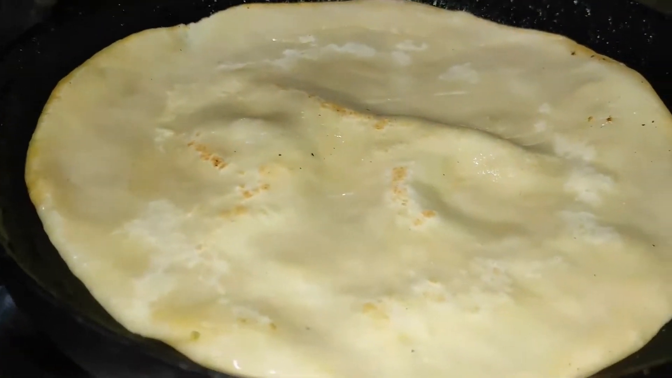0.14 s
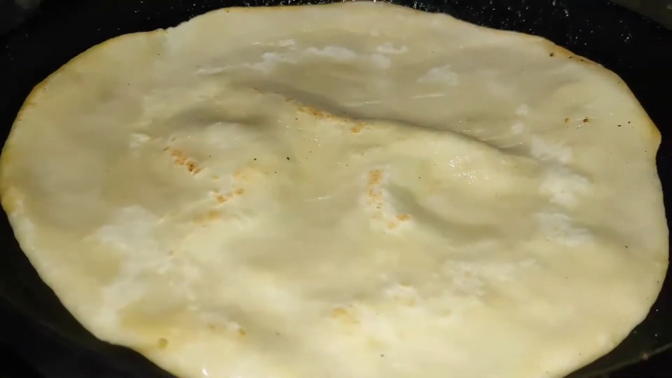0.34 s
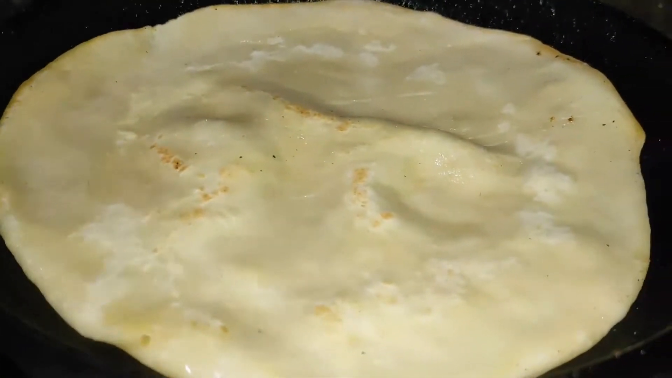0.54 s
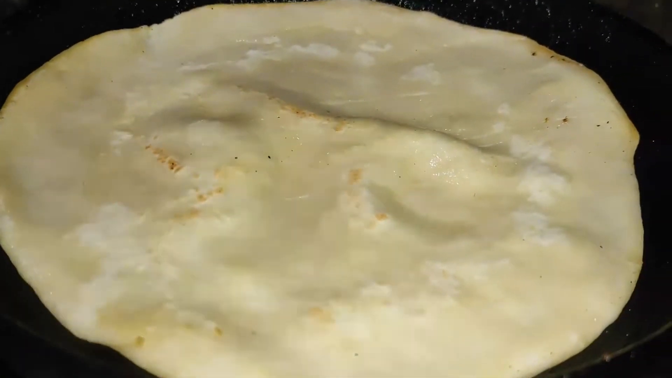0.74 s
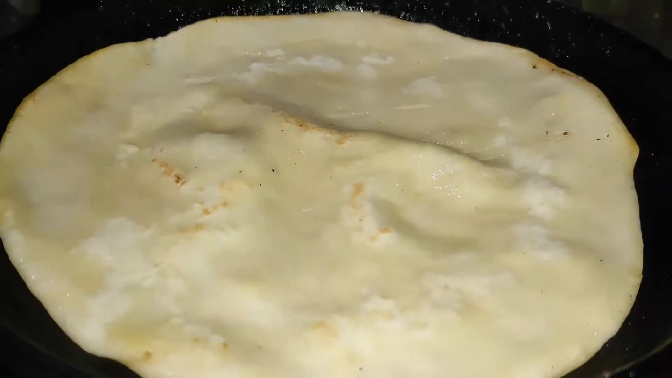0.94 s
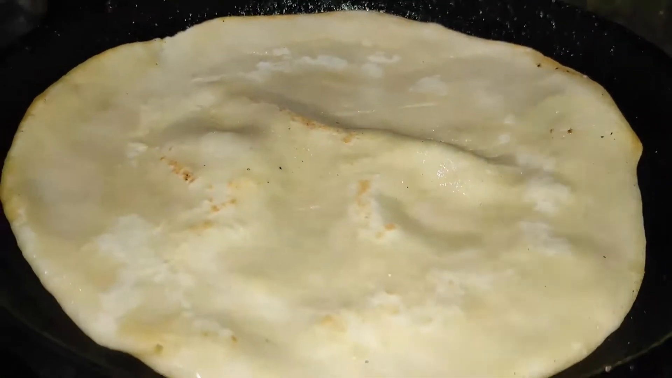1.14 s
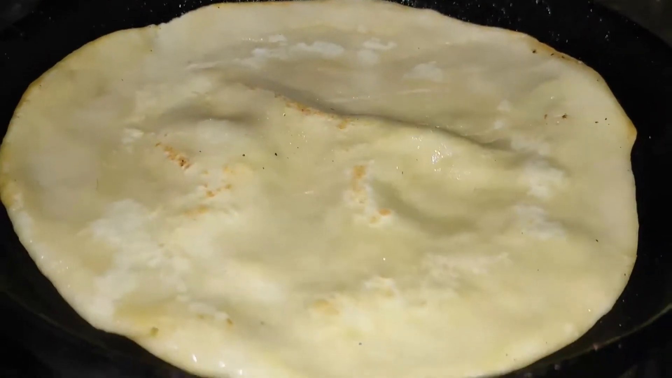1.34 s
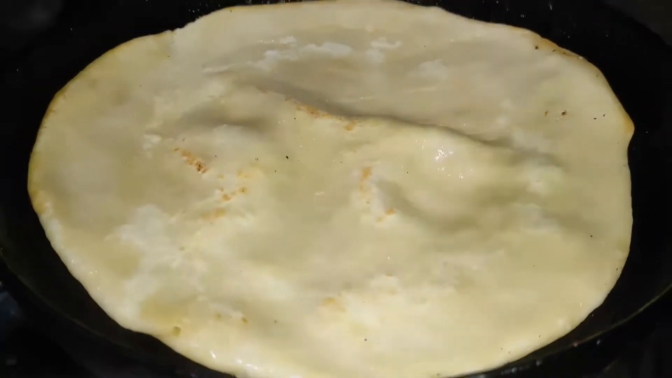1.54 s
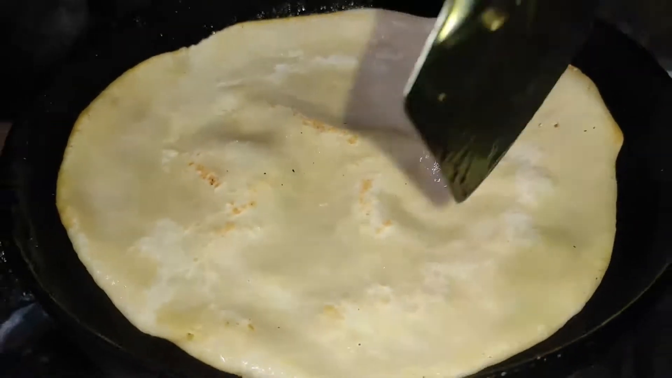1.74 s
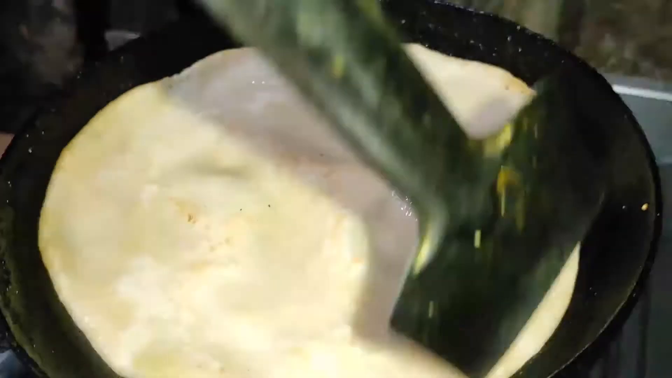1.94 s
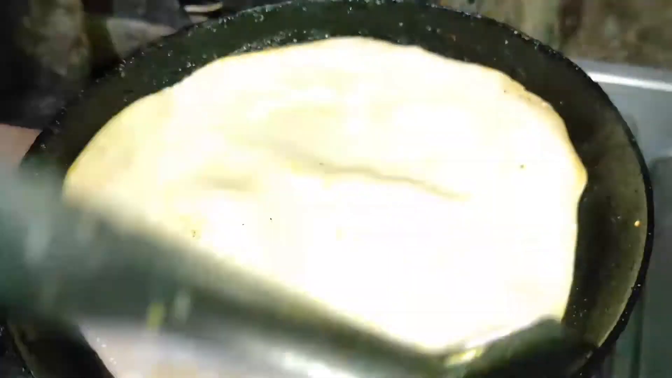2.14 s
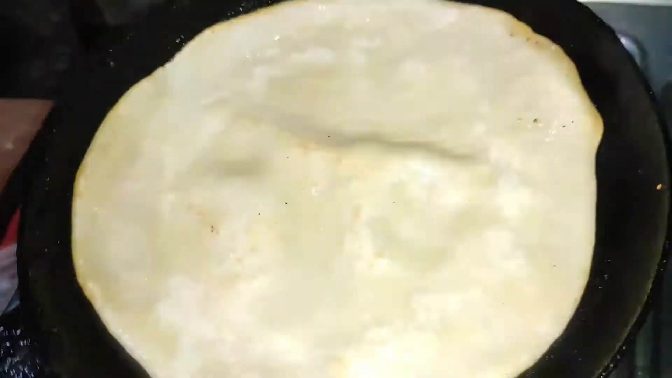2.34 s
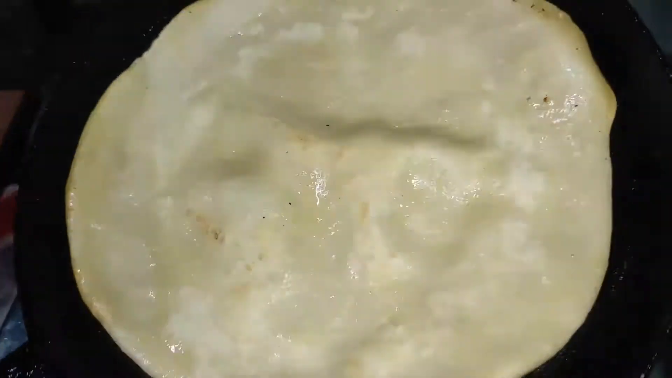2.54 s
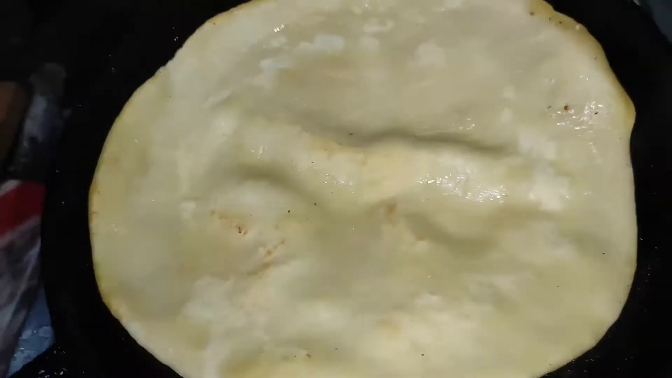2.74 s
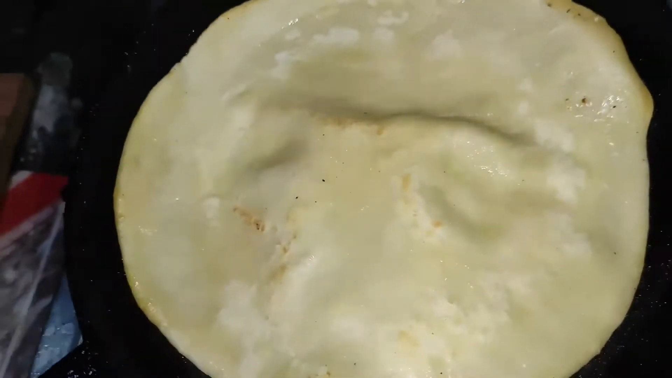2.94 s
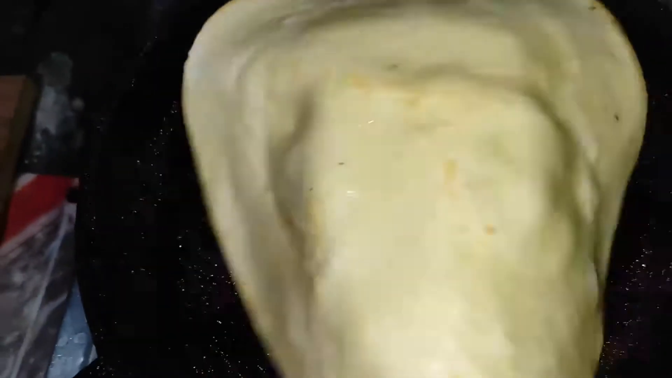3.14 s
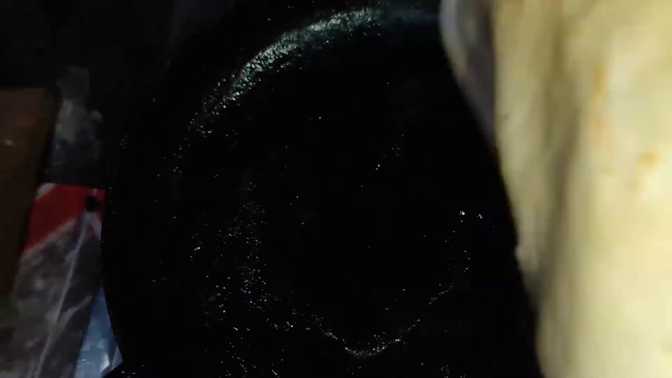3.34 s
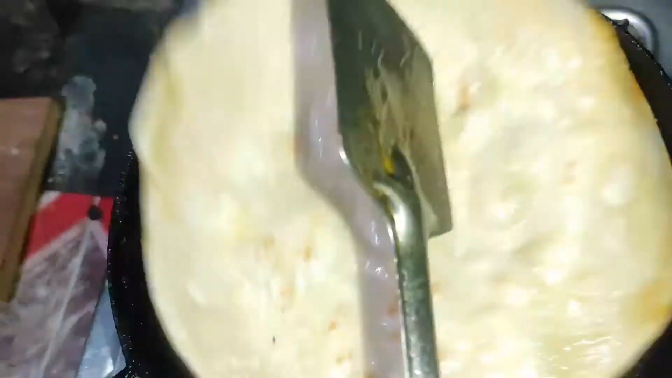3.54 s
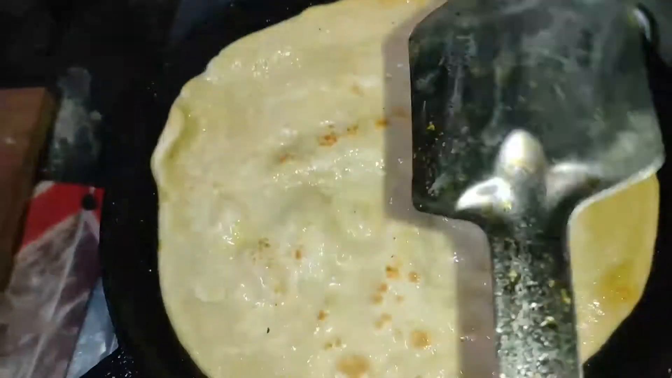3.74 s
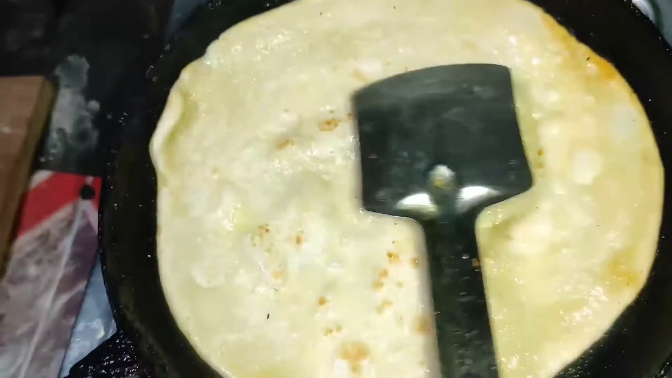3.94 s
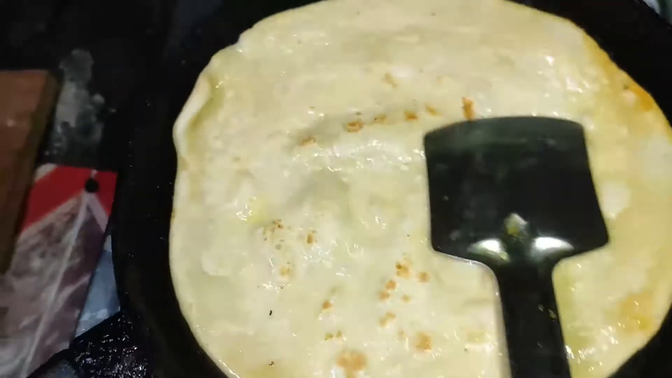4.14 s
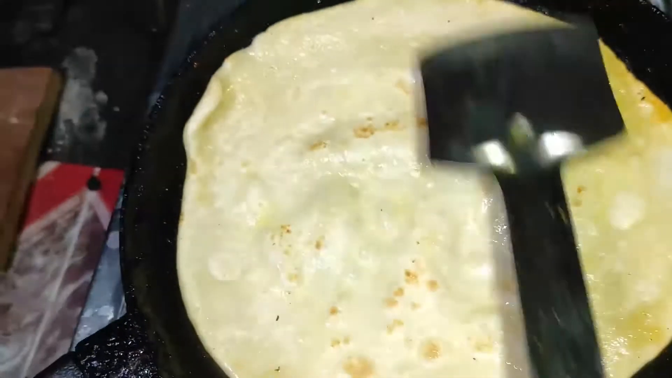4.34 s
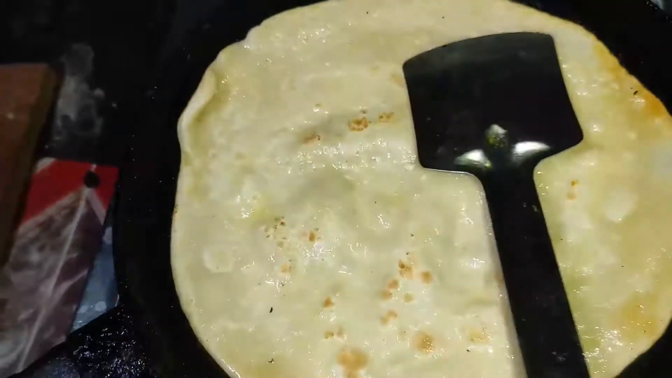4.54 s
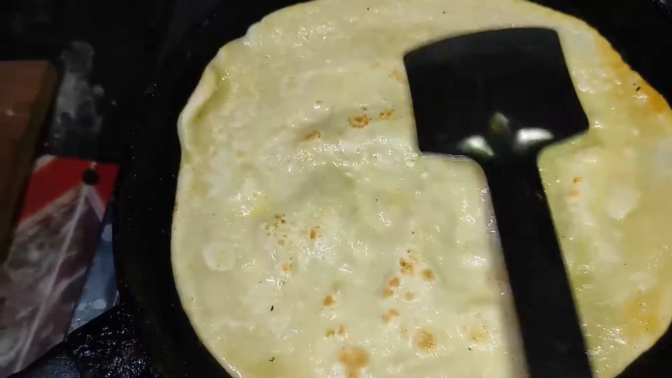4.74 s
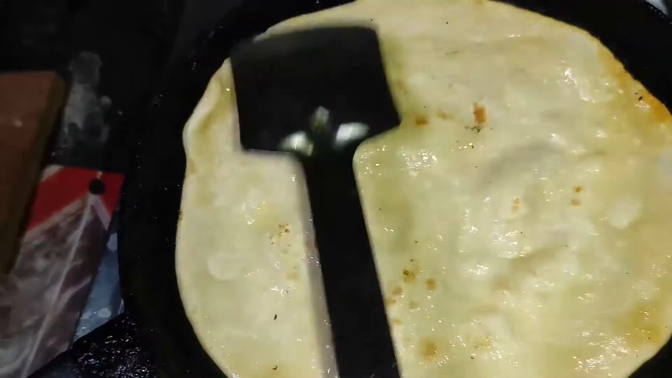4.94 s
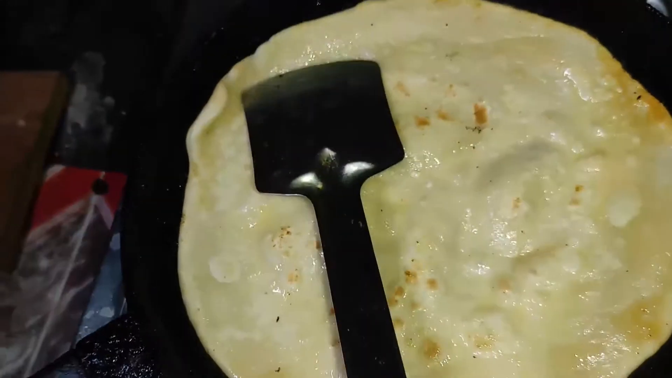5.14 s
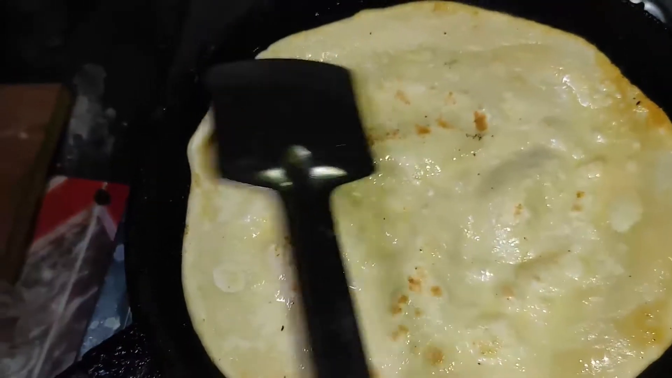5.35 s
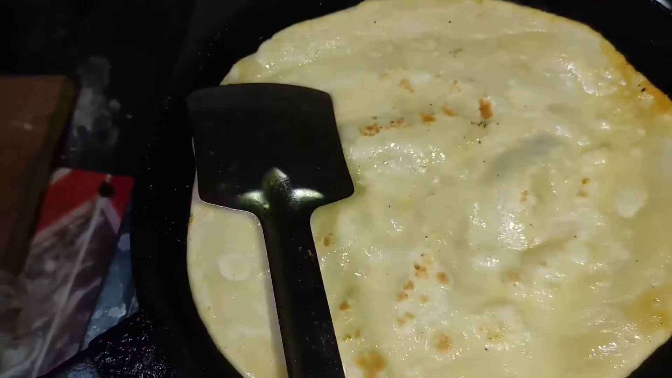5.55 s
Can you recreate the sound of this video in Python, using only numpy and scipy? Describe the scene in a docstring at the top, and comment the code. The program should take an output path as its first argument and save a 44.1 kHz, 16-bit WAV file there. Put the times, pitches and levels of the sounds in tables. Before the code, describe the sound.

A steel spatula knocks and scrapes on a flat iron pan while a flatbread sizzles faintly in oil.

```python
"""A steel spatula knocks on a flat iron pan, close to the microphone's two ports, in a small kitchen.
Each knock is a crunch of contact, a thump of the bending pan and a boom of pan and room; tinks ring steel.
The blade scrapes under a flatbread, wipes over it and rubs it about: grainy friction, some through resonances.
Around it oil sizzles, spits and spatters as crowds of tiny random bursts, among dry ticks and light taps.
Underneath, the stove murmurs as low coloured noise that slowly sinks, with one brief low sputter."""
import sys
import numpy as np
from scipy import signal
from scipy.fft import rfft, irfft, next_fast_len
from scipy.io import wavfile
from scipy.ndimage import uniform_filter1d, map_coordinates

SR = 44100
rng = np.random.default_rng(int(sys.argv[2]) if len(sys.argv) > 2 else 0)


def to_wav(sig):
    """Store sig (one row per channel, or 1-D mono) as 16-bit WAV at the path in sys.argv[1].

    Samples outside -1..1 are clipped; the rate is SR.
    """
    pcm = np.clip(np.atleast_2d(sig), -1, 1) * 32767
    pcm = np.round(pcm).astype(np.int16)
    wavfile.write(sys.argv[1], SR, pcm.T)  # frames by channels


N = 247401
TIME = np.arange(N) / SR

# spatula blows on the pan: start_s, contact_db, contact_length_s, treble_db, boom_db, dullness_db_per_octave
KNOCKS = [(2.372, -39, 0.0023, 11.5, -32, 6), (2.413, -35.5, 0.0015, 5, -34.5, 6.5),
          (2.503, -36.5, 0.004, 14, -30.5, 8), (2.685, -41, 0.0098, 24, -38, 5),
          (2.9901, -19, 0.0022, -14, -25, 0.5), (3.004, -30, .005, -4, -24, 1.5),
          (3.327, -37.5, 0.0042, 21, -42, 2), (3.939, -23, 0.0037, 7, -34, 12),
          (3.945, -16.3, 0.0042, 1, -20.5, 1.5), (3.97, -21.5, 0.0071, -1, -18, 2),
          (3.982, -27, 0.0048, -0.5, -23, 4.5), (4.347, -40.5, 0.0038, 4, -47, -1.5),
          (4.52, -50, 0.0037, 9, -43, 9), (4.8045, -36.5, 0.0013, -17, -38.5, 6.5),
          (5.347, -52.5, 0.0039, 2, -47.5, 7)]
# colour of the blade's contact: freq_hz, level_db
BLADE_COLOUR = [(60, -27), (200, -17), (400, 1), (700, -14.5), (1000, 9.5), (1350, 6), (1950, 0),
                (2600, 4.5), (3800, -6), (4800, -10), (6300, -3), (8200, 3.5), (9800, -21), (15000, -17)]
# colour of the boom of pan and room: freq_hz, level_db
BOOM_COLOUR = [(30, -10), (90, -12), (200, -1.5), (550, 1), (1200, -2), (1900, -9.5), (2600, -4.5),
               (4000, -14.5), (6000, -13.5), (8200, -6), (15000, -55)]
# how long the boom lasts: freq_hz, t60_s
BOOM_T60 = [(100, 0.71), (400, 0.31), (1200, 0.5), (3000, 0.33), (8000, 0.31)]
# ringing modes of the pan: pitch_hz, level_db, t60_s
PAN_MODES = [(101.9, -1.5, 0.58), (149, -5.5, 0.26), (197, -1.5, 0.5), (236.8, -0.5, 0.32), (297, -4, 0.66),
             (346, 0.5, 0.64), (421, -1.5, 0.53), (451, 3, 0.28), (588, -2, 0.44), (690, 4.5, 0.42),
             (758, 0, 0.44), (1053, 4.5, 0.19), (1214, 3, 0.24), (1360, 6, 0.23)]
# a shorter contact is brighter: it tilts by this many dB per octave for each halving of the neutral length
HARDENING_DB, NEUTRAL_CONTACT_S = 4, 0.0028
# light tinks of steel: start_s, level_db, t60_s, left_right_db
TINKS = [(.699, -36.5, 0.12, 24), (0.8407, -29, 0.17, 3), (3.638, -35, 0.15, 23), (4.343, -39.5, 0.12, 19),
         (4.817, -41.5, 0.26, 13)]
# modes of the steel: pitch_hz, level_db, share_of_t60
STEEL_MODES = [(8370, -3.5, 0.84), (12100, -19, 0.41), (14400, -25, .5)]
# the blade catches, then slides under the bread in two pushes: peak_s, level_db, fade_s
SCRAPES = [(2.972, -35.5, 0.028), (3.09, -38, 0.13), (3.23, -40, 0.048)]
# resonances of the sliding blade, woken as the contact travels: peak_s, pitch_hz, level_db, glide_octaves_per_s
SCRAPE_MODES = [(3.05, 880, -42, 0), (3.095, 1335, -36.5, .6), (3.09, 2110, -44, -.4),
                (3.138, 2370, -41.5, -.5), (3.165, 2745, -47, 0), (3.2, 2150, -40.5, -.7),
                (3.205, 990, -39, -1.2), (3.21, 3130, -48, 0), (3.275, 950, -43.5, -.3)]
# the blade wipes over the bread: peak_s, level_db, fade_s
WIPES = [(4.52, -43.5, 0.087), (4.87, -52.5, 0.1), (5.58, -58.5, 0.27)]
# colour of the wiping: freq_hz, level_db
WIPING_COLOUR = [(60, -9.5), (360, 5.5), (540, -2.5), (680, -1), (1300, 1), (2000, -8.5), (2750, -1.5),
                 (5000, -13.5), (12000, -35)]
# shoves that rub bread and blade over the iron: peak_s, level_db, fade_s
SHOVES = [(2.43, -44, 0.042), (2.56, -45.5, 0.1), (2.72, -47.5, 0.17), (2.96, -48.5, 0.068),
          (3.15, -50.5, 0.27)]
# colour of the rubbing: freq_hz, level_db
RUBBING_COLOUR = [(50, -9), (150, -19), (240, 5.5), (320, -4), (435, 8), (540, -8.5), (720, 4), (920, -4.5),
                  (1500, -18), (2700, -12.5), (12000, -34)]
# the bread sticks and groans on the iron: peak_s, level_db, pitch_hz
GROANS = [(2.38, -36, 728), (2.393, -38, 245.8), (2.508, -39.5, 922), (2.593, -44, 245),
          (2.716, -42.5, 730), (2.752, -47, 740)]
# small dry ticks and light taps at the pan: start_s, level_db
TICKS_AND_TAPS = [(0.664, -53), (0.974, -52), (1.404, -58), (1.603, -53.5), (1.839, -55), (4.42, -51.5),
                  (4.8049, -43.5), (5.053, -54.5)]
# short bright bursts, spits of oil and one hissing scuff (at 2.496 s): start_s, level_db, length_s
BRIGHT_BURSTS = [(0.0248, -45, 0.00057), (0.192, -44.5, 0.008), (0.597, -43, 0.006), (2.496, -34.5, .012),
                 (2.892, -39.5, 0.000403), (2.922, -37, .005), (3.073, -33, .002), (3.54, -34.5, 0.00068),
                 (3.594, -38.5, 0.002), (3.666, -39.5, 0.001), (3.742, -31, 0.0045), (3.831, -37.5, 0.0035),
                 (4.167, -43.5, .0004), (4.3175, -49, 0.0003)]
# colour of these bright bursts: freq_hz, level_db
SPIT_COLOUR = [(500, -35), (2000, -14.5), (3500, -8), (5500, -7), (7000, 5.5), (8300, 10.5), (10000, -7.5),
               (15000, -13)]
# colour of the fine crackle of oil at the bread's edge: freq_hz, level_db
CRACKLE_COLOUR = [(800, -26), (2400, 4), (3300, -7), (6200, -6.5), (9500, 1), (15000, 2.5)]
# the sizzle flares when moist dough meets hot oil: peak_s, level_db, fade_s
FLARES = [(1.0, -54.5, 1), (1.66, -45.5, 0.1), (1.97, -51, 0.39), (2.65, -44, 0.12), (3.11, -32, 0.31),
          (3.48, -44, 0.11), (3.88, -45.5, 0.27), (4.43, -43.5, 0.054)]
# colour of the sizzle: freq_hz, level_db
FIZZ_COLOUR = [(1000, -24.5), (2300, -17.5), (3100, -17), (4000, -17.5), (5300, -14), (6500, -9), (7500, 0),
               (8200, -1), (8900, -5), (9900, -21), (12000, -21), (15500, -27)]
# steam escapes at the left rim of the pan: peak_s, level_db, fade_s
VENTS = [(.12, -45, 0.85), (1.72, -54.5, 0.47)]
# colour of the steam's lower hiss: freq_hz, level_db
RIM_HISS_COLOUR = [(300, -9), (600, -7), (1600, -4.5), (2350, 0.5), (3150, 0.5), (4200, -5.5), (6100, 5),
                   (10000, -10), (15000, -18)]
# murmur of the stove: freq_hz, level_db
STOVE_COLOUR = [(20, -2), (40, -21), (54, 4), (76, -9.5), (102, 0), (132, -5.5), (235, -0.5), (520, -16.5),
                (680, -7), (900, -14), (2800, -14), (6500, -39)]
# a brief low sputter, perhaps dough puffing, swells in the murmur: peak_s, level_db, fade_s
SPUTTERS = [(1.52, -55, .1)]
# steady levels of the sizzle and, halfway through, of the stove (dB)
SIZZLE_DB, STOVE_DB = -51.5, -57.5
# close echoes off the rim and the wall: left_delay_s, right_delay_s, level_db
ECHOES = [(.0011, 0.0046, -27), (.0027, 0.0035, -15.5), (.0046, 0.0068, -2)]
# likeness of the two microphone ports (1 same, 0 unrelated, below 0 opposed): freq_hz, likeness
LIKENESS = [(40, 1.2), (300, 0.7), (700, 0.66), (1500, 0.05), (3000, 0.25), (6000, 0), (15000, -0.5)]
# balance of the two microphone ports: freq_hz, left_right_db
BALANCE = [(40, 3), (160, 5.5), (400, 2), (800, 1.5), (1300, -2), (2400, 3), (3200, 4), (4000, -0.5),
           (7300, -2), (8600, 4), (14000, 0)]
EDGE_HZ = 15950  # upper band limit


def knocks(flex_db=-15):
    """Each blow is a short crunch of steel on iron, a thump as the pan bends, then the boom."""
    out = np.zeros((2, N))
    for s, db, length, treble_db, boom_db, dull_db in KNOCKS:
        hardness_db = HARDENING_DB * np.log2(NEUTRAL_CONTACT_S / length)

        def tone(hz):
            treble = treble_db * np.clip((hz - 3800) / 2200, 0, 1)
            return treble + hardness_db * np.log2(np.clip(hz, 300, 4000))

        crunch = blow(colour(burst(length), BLADE_COLOUR, tone))
        add(out, s - 3 * length, amp(db) * crunch)  # the snap falls on s
        add(out, s, amp(boom_db + flex_db) * flex())
        add(out, s, amp(boom_db) * boom(dull_db))
    return out


def burst(length, snap=3, shared=0.065, size=4096):
    """A contact that swells over its length, snaps and dies away; starts 3 lengths before the snap."""
    u = np.arange(size) / SR / length - 3  # time from the snap, in lengths
    grit = noise(size)
    grit = unit(grit + shared * grit[::-1])  # sound straight from the contact is more alike at both ports
    crunch = grit * np.where(u < 0, np.exp(-u ** 2), np.exp(-abs(u)))
    click = np.arange(size) == np.argmin(abs(u))
    z = rfft(crunch + snap * click)
    # the force itself is broadly white: its colour comes from what it strikes
    power = uniform_filter1d(abs(z) ** 2, size=50, axis=1)
    return irfft(z / np.sqrt(power + 1e-12))


def flex(top_hz=1300, low_hz=210, fall_s=0.00273, fade_s=0.0074, size=4096):
    """The pan bends under a blow: high bending waves arrive first, low ones a few milliseconds later."""
    t = np.arange(size) / SR
    hz = low_hz + (top_hz - low_hz) * np.exp(-t / fall_s)
    thump = np.sin(2 * np.pi * np.cumsum(hz) / SR) * t * np.exp(-2 * t / fade_s)
    return blow(np.tile(thump, (2, 1)))


def boom(dull_db, modes_db=-4.5, rise_s=0.0012, clatter_db=1.5, spot_db=4.0, chatter=0.44,
         punch=0.38, punch_s=0.018, size=32768):
    """The pan's modes and the kitchen's diffuse answer to one blow; dough dulls the blow."""
    hz, s, z = signal.stft(noise(size), SR, nperseg=256)
    # the pan rattles on its grate
    clatter = clatter_db * unit(uniform_filter1d(rng.standard_normal(z.shape), size=9, axis=0))
    decay_db = -60 * s / read(BOOM_T60, hz)[:, None]
    wash = signal.istft(z * amp(clatter + decay_db), SR, nperseg=256)[1]
    t, ring = np.arange(size) / SR, np.zeros((2, size))
    for f, db, t60 in PAN_MODES:
        level_db = db + spot_db * rng.standard_normal()  # each spot on the pan favours other modes
        phase = rng.random() + rng.normal(0, f / 1e4, (2, 1))  # in turns; the ports differ more when higher
        # the loose seat roughens the ring
        rattle = unit(uniform_filter1d(rng.standard_normal(len(s)), size=6))
        seat = 1 + chatter * np.interp(t, s, rattle)
        ring += seat * amp(level_db - 60 * t / t60) * np.sin(2 * np.pi * (f * t + phase))
    both = blow(colour(wash, BOOM_COLOUR)) + amp(modes_db) * blow(ring)
    onset = (1 - np.exp(-t / rise_s)) * (1 + punch * np.exp(-t / punch_s))
    dullness = [(400, 0), (3200, -3 * dull_db)]  # three octaves
    return blow(colour(both * onset, dullness))


def tinks(size=8192):
    """Light touches ring only the high modes of the steel."""
    out, t = np.zeros((2, N)), np.arange(size) / SR
    for s, db, t60, left_right_db in TINKS:
        ring = np.zeros(size)
        for f, level_db, share in STEEL_MODES:
            ring += amp(level_db - 60 * t / (t60 * share)) * np.sin(2 * np.pi * f * t)
        side_db = np.array([[left_right_db], [-left_right_db]]) / 2
        add(out, s, amp(db + side_db) * ring)
    return out


def scrape(width_hz=115, wander=.01, ring_s=.033):
    """Quick slips rasp and ring the blade; its resonances chirp and glide as it goes under the bread."""
    slips = crackle(per_s=1500, spread_db=0.5, grain_s=0.0011)
    rasp = unit(colour(slips, BLADE_COLOUR) * amp(2.43 * drift(90)))
    out = rasp * swells(SCRAPES, rise_share=0.39, roundness=2.0)
    for s, f, db, glide in SCRAPE_MODES:
        hz = f * 2 ** (glide * np.tanh(TIME - s))
        hz *= 1 + wander * drift(60)  # the contact point wanders
        ring = unit(resonate(resonate(slips, hz, width_hz), hz, width_hz))
        out += ring * swells([(s, db, ring_s)], rise_share=1.0)
    return out


def wipe():
    """The flat of the blade glides over the oiled top of the bread in a dense rasp of grains."""
    grains = crackle(per_s=1400, spread_db=6.0, grain_s=0.0027)
    return unit(colour(grains, WIPING_COLOUR)) * swells(WIPES, rise_share=1.4)


def rub(groan_s=0.015, groan_waver=0.0294, groan_rough_db=2.0, lumps_db=3.0):
    """Soft friction stirs the low resonances of the pan in a rustle, and groans where it sticks."""
    friction = crackle(per_s=1600, spread_db=1.0, grain_s=0.003)
    rustle = unit(colour(friction, RUBBING_COLOUR) * amp(lumps_db * drift(45)))
    out = rustle * swells(SHOVES, rise_share=1.0)
    for s, db, hz in GROANS:
        turns = np.cumsum(hz * (1 + groan_waver * drift(200))) / SR
        groan = unit(np.sin(2 * np.pi * turns) * amp(groan_rough_db * drift(150)))
        out += groan * swells([(s, db, groan_s)], rise_share=0.53)
    return out


def ticks_and_taps(length_s=0.0016, middle_hz=1900, skirt_db=7):
    """Small dry ticks and light taps at the pan: brief snaps weighted towards the middle of the spectrum."""
    out = np.zeros((2, N))

    def skirts(hz):
        return -skirt_db * np.log2(np.clip(hz, 300, 8000) / middle_hz) ** 2

    for s, db in TICKS_AND_TAPS:
        snap = colour(burst(length_s), BLADE_COLOUR, skirts)
        add(out, s - 3 * length_s, amp(db) * blow(snap))
    return out


def bright_bursts(tail_db=-14, tail_t60=0.45, size=8192):
    """Spits of oil and one hissing scuff: short bright bursts, each with a faint room tail."""
    out, t = np.zeros((2, N)), np.arange(size) / SR
    for s, db, length in BRIGHT_BURSTS:
        add(out, s - 3 * length, amp(db) * blow(colour(burst(length), SPIT_COLOUR)))
        tail = noise(size) * np.exp(-np.log(1000) * t / tail_t60)
        add(out, s, amp(db + tail_db) * blow(colour(tail, FIZZ_COLOUR)))
    return out


def spatter(level_db=-63.0, flare_db=-18):
    """Tiny separate snaps of oil along the edge of the bread, louder when the sizzle flares."""
    snaps = unit(colour(crackle(per_s=520, spread_db=3.5, grain_s=0.0016), CRACKLE_COLOUR))
    return snaps * np.hypot(amp(level_db), amp(flare_db) * swells(FLARES, rise_share=0.58))


def sizzle(pops_db=-3, rim_right_db=-11, clump_db=1.0, stray_db=-16):
    """Countless small bubbles merge into a fizz; nearer ones pop in clumps, strays spit, steam hisses at left."""
    pops = crackle(per_s=800, spread_db=9.5, grain_s=0.00066) * amp(clump_db * drift(22))
    bubbles = noise(N) * amp(0.52 * drift(60)) + amp(pops_db) * pops
    steam = colour(crackle(per_s=2200, spread_db=3.9, grain_s=0.0011), RIM_HISS_COLOUR)
    rim = unit(steam) * swells(VENTS, rise_share=0.77, roundness=2.07)
    strays = unit(colour(crackle(per_s=35, spread_db=4.0, grain_s=0.0021), SPIT_COLOUR))
    frying = np.hypot(amp(SIZZLE_DB), swells(FLARES, rise_share=0.73))
    # narrow parts of the fizz swell and sink at random
    fizz = patchy(colour(bubbles, FIZZ_COLOUR), depth_db=4.5, span_hz=168.1, span_s=.04)
    return (fizz + amp(stray_db) * strays) * frying + rim * amp([[0], [rim_right_db]])


def stove(flutter_db=0.96, blisters_db=-12, fade_db_per_s=0.65):
    """The burner's slowly sinking flutter, soft pops of steam under the dough, and a brief low sputter."""
    burner = unit(colour(noise(N), STOVE_COLOUR, size=8192)) * amp(flutter_db * drift(12))
    blisters = unit(colour(crackle(per_s=81, spread_db=0.5, grain_s=0.0044), BOOM_COLOUR))
    steady = amp(STOVE_DB - fade_db_per_s * (TIME - TIME.mean()))
    return (burner + amp(blisters_db) * blisters) * np.hypot(steady, swells(SPUTTERS, rise_share=1))


def reflect(x):
    """Close echoes comb the sound, differently at each port; the gain offsets the power they add."""
    out = x.copy()
    for *delays, db in ECHOES:
        late = [np.pad(port, (round(d * SR), 0))[:N] for d, port in zip(delays, x)]
        out += amp(db) * np.array(late)
    return out / np.sqrt(1 + sum(amp(db) ** 2 for *_, db in ECHOES))


def amp(db):
    """Decibels to gain."""
    return 10 ** (np.asarray(db) / 20)


def unit(x):
    """Scales to rms 1."""
    return x / np.sqrt(np.mean(x ** 2) + 1e-20)


def blow(x):
    """Scales a short sound to the energy of 10 ms at rms 1."""
    return x / np.sqrt(np.mean(np.sum(x ** 2, -1)) * 100 / SR + 1e-20)


def read(points, hz):
    """Reads a spectrum on a log-frequency axis."""
    f, value = np.transpose(points)
    return np.interp(np.log(hz + 1), np.log(f), value)


def add(mix, s, sound):
    """Mixes a stereo sound in at time s."""
    part = mix[:, max(round(s * SR), 0):][:, :sound.shape[1]]
    part += sound[:, :part.shape[1]]


def colour(x, shape, extra=lambda hz: 0, size=2048):
    """Causal (minimum-phase) filter with the given spectrum, plus an optional dB rule."""
    hz = np.fft.rfftfreq(size, 1 / SR)
    cepstrum = irfft(np.log(amp(read(shape, hz) + extra(hz))))
    # fold the cepstrum forward in time so that nothing sounds early
    cepstrum[1:size // 2] *= 2
    cepstrum[size // 2 + 1:] = 0
    response = irfft(np.exp(rfft(cepstrum)))
    return signal.oaconvolve(x, response[None], axes=1)[:, :x.shape[1]]


def resonate(x, hz, width):
    """A resonance of gain 1 that follows the curve hz."""
    turn = np.exp(2j * np.pi * np.cumsum(hz) / SR)
    r = np.exp(-np.pi * width / SR)
    # shift the pitch down to zero, smooth, and shift back up
    return 2 * (turn * signal.lfilter([1 - r], [1, -r], x / turn)).real


def ports(x):
    """Makes two unrelated signals alike in the bass, as two nearby ports hear them."""
    size = next_fast_len(x.shape[1])
    a, b = rfft(x, size)
    same = np.clip(read(LIKENESS, np.fft.rfftfreq(size, 1 / SR)), -1, 1)
    right = same * a + np.sqrt(1 - same ** 2) * b
    return irfft(np.array([a, right]), size)[:, :x.shape[1]]


def noise(size):
    """White noise at both ports."""
    return ports(rng.standard_normal((2, size)))


def drift(per_s):
    """A random curve of rms 1 through per_s chance points a second."""
    points = rng.standard_normal(N // 16)
    return unit(np.interp(TIME * per_s, np.arange(len(points)), points))


def crackle(per_s, spread_db, grain_s):
    """Tiny decaying bursts of noise at random times; the spread makes a few larger than the rest."""
    sizes = amp(spread_db * np.minimum(rng.exponential(1, N), 4.5))
    starts = rng.random(N) < per_s / SR
    envelope = signal.lfilter([1], [1, -np.exp(-1 / (grain_s * SR))], sizes * starts)
    return unit(noise(N) * envelope)


def swells(rows, rise_share, roundness=1.5):
    """Gain of overlapping swells: each is 10 dB down one fade after its peak, and a share of that before it."""
    power = np.zeros(N)
    for s, db, fade_s in rows:
        away = np.maximum((TIME - s) / fade_s, (s - TIME) / (rise_share * fade_s))
        power += amp(db - 10 * away ** roundness) ** 2
    return np.sqrt(power)


def patchy(x, depth_db, span_hz, span_s):
    """Lets narrow parts of the spectrum swell and sink on their own."""
    z = signal.stft(x, SR, nperseg=512)[2]
    bins, frames = np.indices(z.shape[1:])
    place = [bins * SR / 512 / span_hz, frames * 256 / SR / span_s]
    chance = rng.standard_normal(z.shape[1:])
    field = unit(map_coordinates(chance, place, order=1, mode="mirror"))
    patched = z * amp(depth_db * np.minimum(field, 1.5))
    return unit(signal.istft(patched, SR, nperseg=512)[1][:, :N])


def scene():
    """Everything on and around the pan; sizzle, scrape and wipe also echo off rim and wall."""
    echoed = reflect(sizzle() + scrape() + wipe())
    struck = knocks() + tinks() + ticks_and_taps()
    return struck + echoed + rub() + bright_bursts() + spatter() + stove()


def record(dry):
    """Each microphone port has its own colour; then the band limit."""
    size = next_fast_len(N + 2048)
    lean_db = read(BALANCE, np.fft.rfftfreq(size, 1 / SR)) / 2
    heard = irfft(rfft(dry, size) * amp([lean_db, -lean_db]), size)[:, :N]
    low_pass = signal.firwin(511, EDGE_HZ, window=("kaiser", 9), fs=SR)
    return signal.oaconvolve(heard, low_pass[None], "same")


dry = scene()
out = record(dry)
to_wav(out)
```